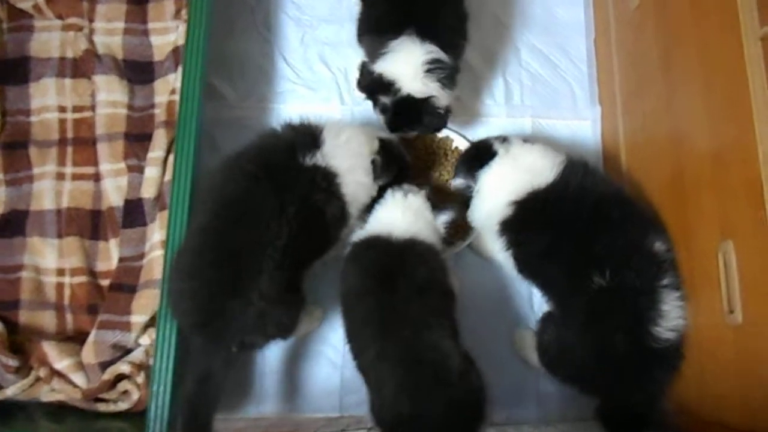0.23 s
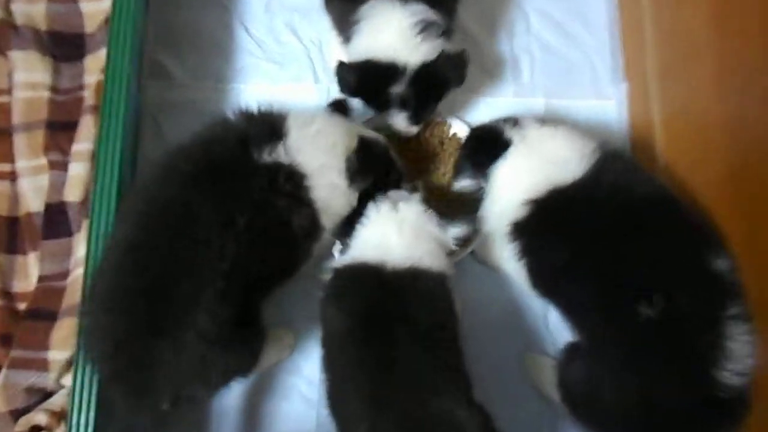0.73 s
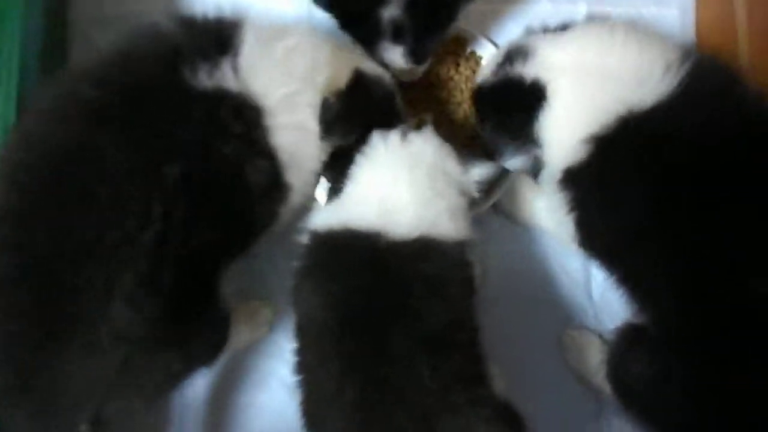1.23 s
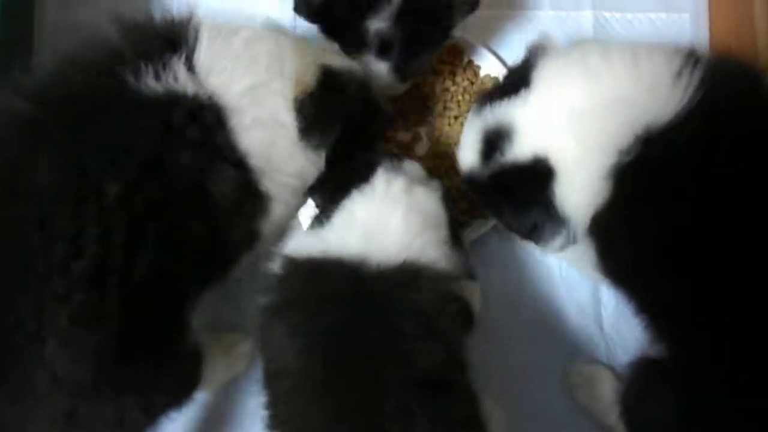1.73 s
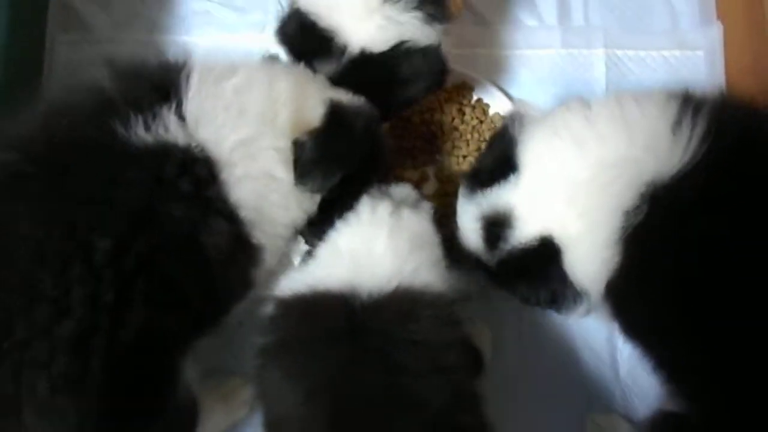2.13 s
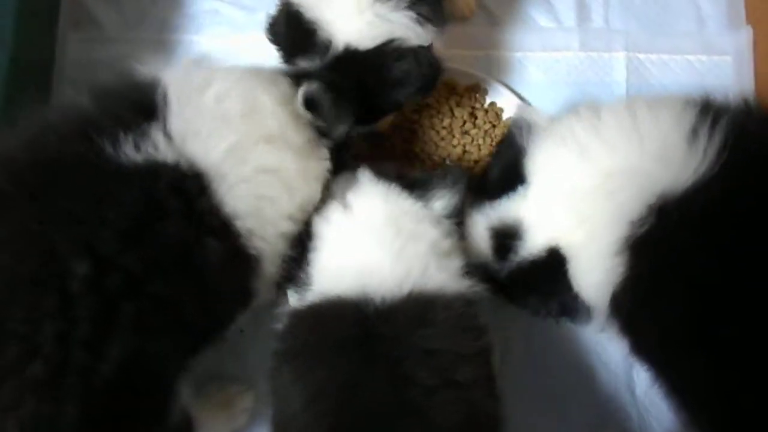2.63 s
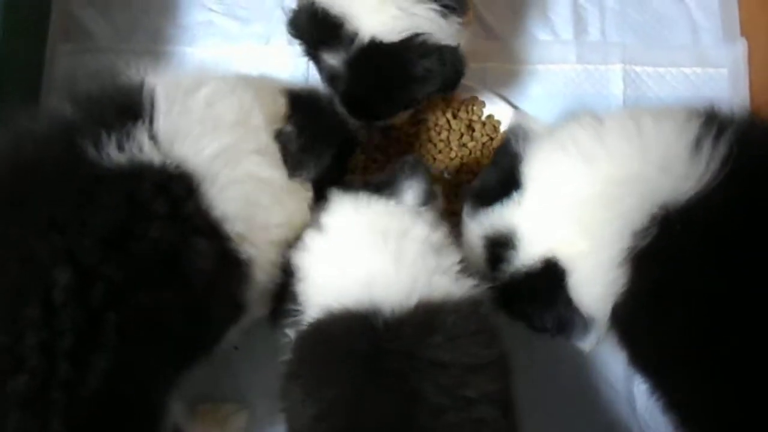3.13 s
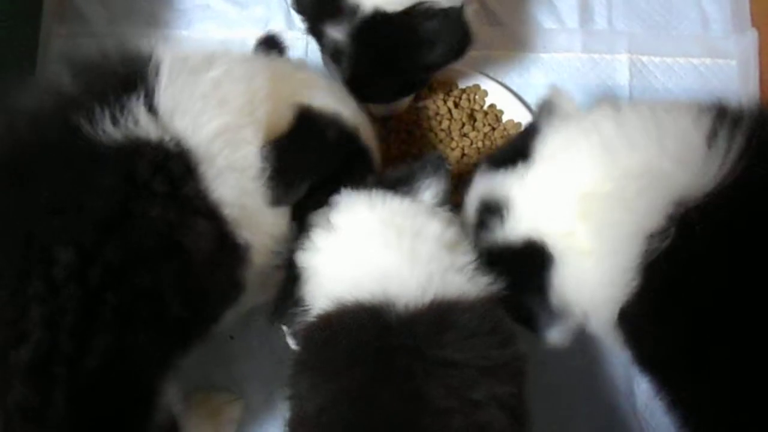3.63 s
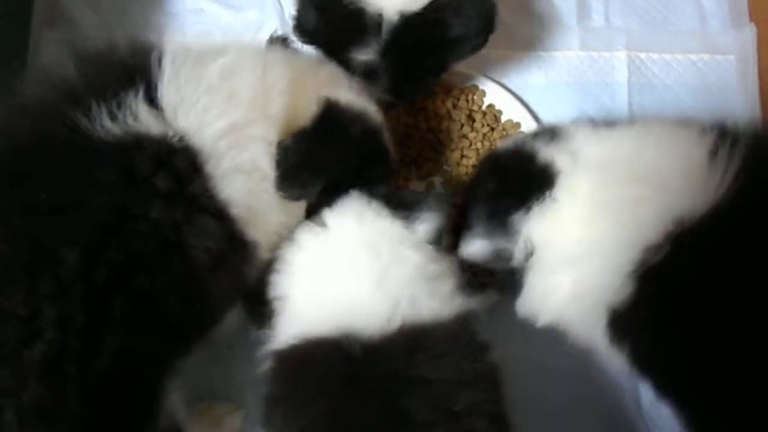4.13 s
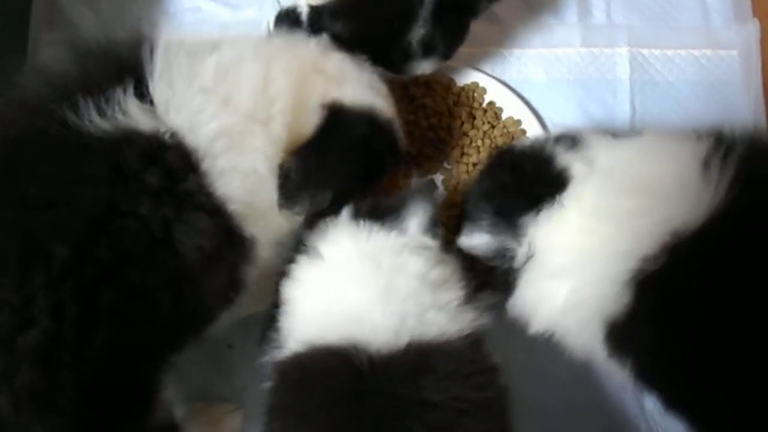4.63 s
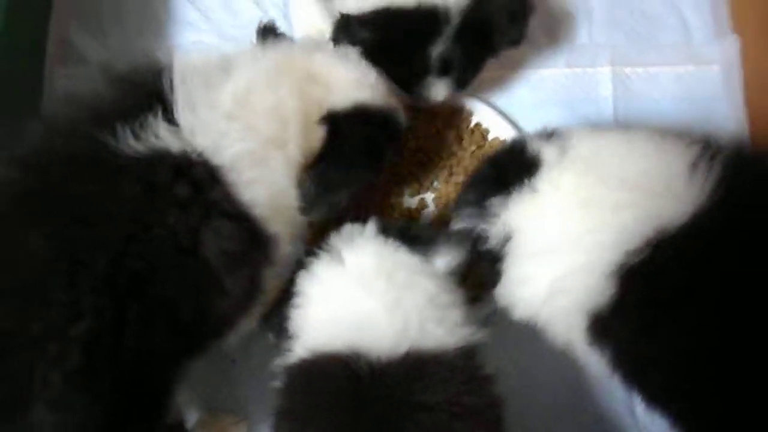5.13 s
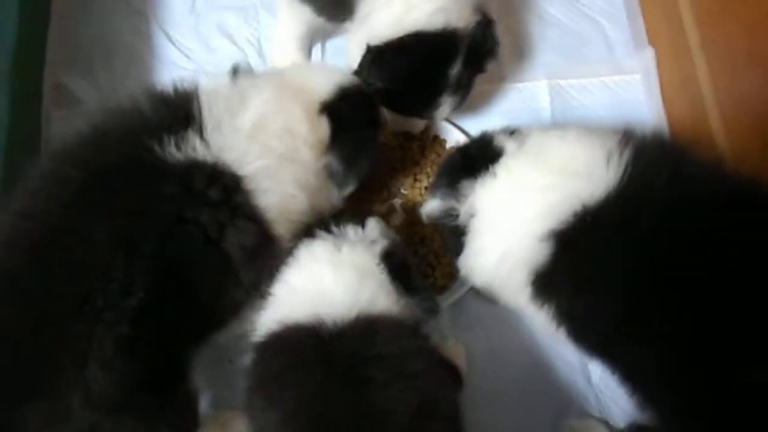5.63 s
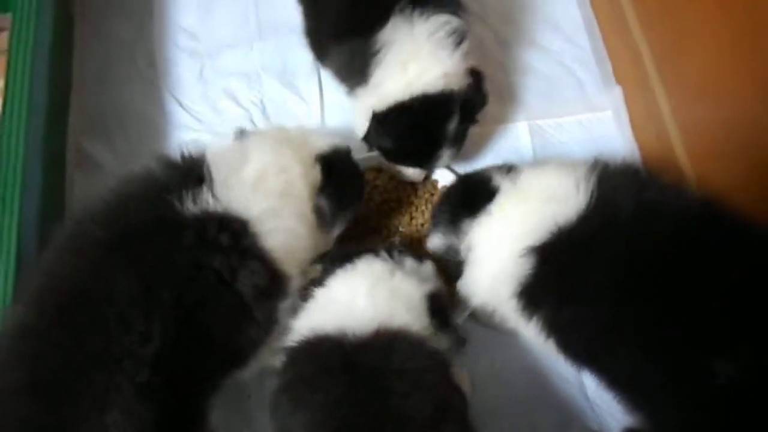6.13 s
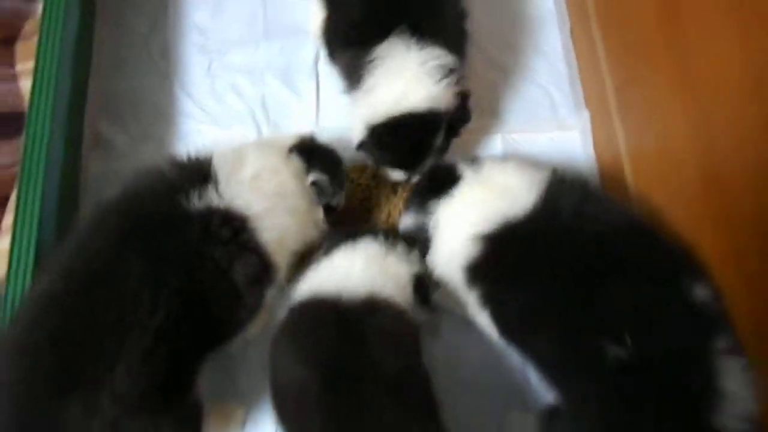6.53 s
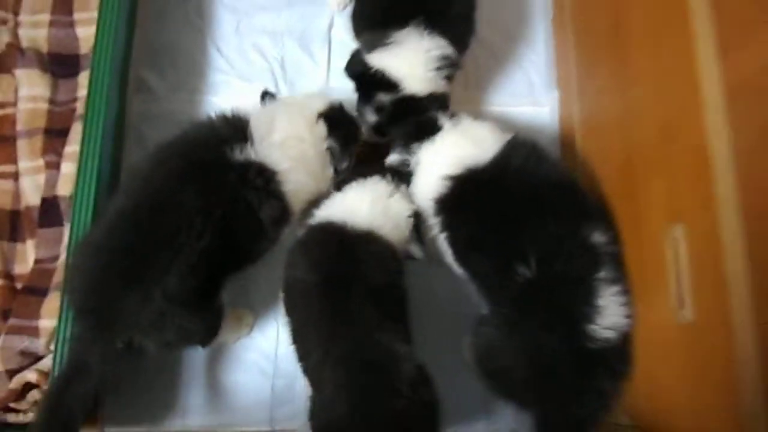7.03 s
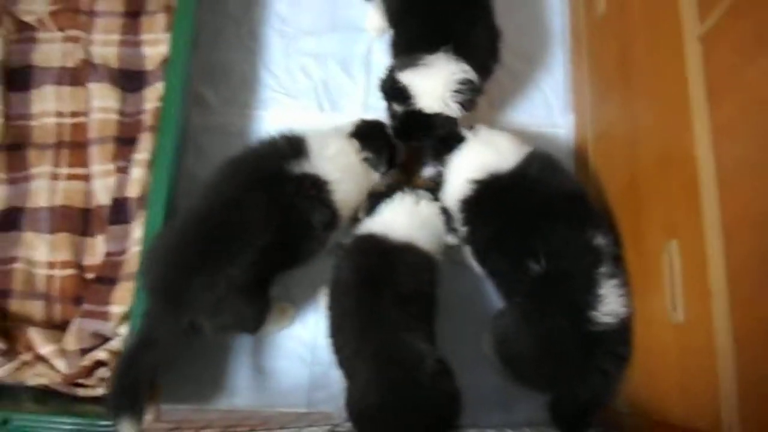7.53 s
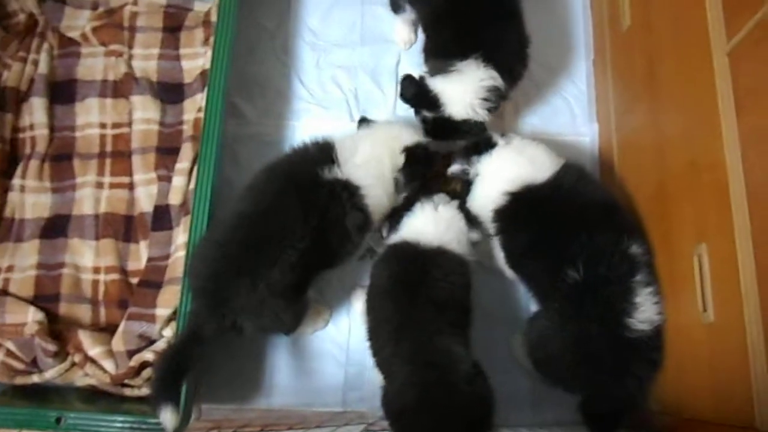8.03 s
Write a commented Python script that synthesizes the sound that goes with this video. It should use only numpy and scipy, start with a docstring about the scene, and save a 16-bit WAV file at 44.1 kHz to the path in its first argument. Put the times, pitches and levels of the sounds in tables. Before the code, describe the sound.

Puppies crunch dry kibble from a metal bowl, with sharp clicks, sniffs and a brief hoarse yelp near the start.

```python
"""Dry kibble cracks and crunches as four puppies crowd a metal bowl in a small room, heard close up.
Teeth snap pellets in ringing clicks and crush them to crumbs; muzzles stir the heap into a patchy rustle.
Air sniffs and whistles through noses, and paws bump the floor. One puppy whines, yelps twice and
whimpers in hoarse, wavering harmonics. Underneath lie room tone and the rumble of a hand-held microphone."""
import sys
import numpy as np
from scipy import signal
from scipy.fft import rfft, irfft, next_fast_len
from scipy.io import wavfile

SR = 44100
rng = np.random.default_rng(int(sys.argv[2]) if len(sys.argv) > 2 else 0)


def dump_mix(stems):
    """Bounce the given channels to the path in sys.argv[1] as a 16-bit WAV at rate SR."""
    frames = np.atleast_2d(stems).T  # one column per channel
    limited = np.clip(frames, -1, 1)  # hard clip at full scale
    pcm = np.round(limited * 32767).astype(np.int16)
    wavfile.write(sys.argv[1], SR, pcm)


N = 365765


def from_db(db):
    return 10 ** (np.asarray(db) / 20)


def rms_one(x):
    return x / np.sqrt(np.mean(x ** 2) + 1e-20)


def curves(rows, t):
    """One curve per column after the first, which holds the times."""
    times, *columns = np.transpose(rows)
    return [np.interp(t, times, column) for column in columns]


def drift(rate_hz, size):
    """Smooth random wander with a spread of 1."""
    pole = np.exp(-16 * np.pi * rate_hz / SR)
    slow = signal.lfilter([1], [1, -2 * pole, pole * pole], rng.standard_normal(size // 8 + 4002))
    return np.interp(np.arange(size) / 8, np.arange(size // 8 + 2), (slow / slow.std())[4000:])


def resonance(x, hz, width_hz):
    """Two-pole band-pass."""
    r = np.exp(-np.pi * width_hz / SR)
    feedback = [1, -2 * r * np.cos(2 * np.pi * hz / SR), r * r]
    return signal.lfilter([(1 - r * r) / 2, 0, (r * r - 1) / 2], feedback, x)


def band(x, hz, width_hz):
    """Two resonances in series for steep skirts; rms 1."""
    return rms_one(resonance(resonance(x, hz, width_hz), hz, 2 * width_hz))


def body(x, modes):
    """Parallel steep resonances with alternating signs."""
    return sum((-1) ** k * from_db(level_db) * resonance(resonance(x, hz, width), hz, 2 * width)
               for k, (hz, width, level_db) in enumerate(modes))


def equalise(x, spectrum):
    """An EQ curve drawn on a log-frequency axis; rms 1."""
    size = next_fast_len(len(x))
    hz, gain_db = np.transpose(spectrum)
    bins_hz = np.arange(size // 2 + 1) * SR / size
    gain = from_db(np.interp(np.log(bins_hz + 1), np.log(hz), gain_db))
    return rms_one(irfft(rfft(x, size) * gain, size)[:len(x)])


def grains(per_s, spread_db, size):
    """Random clicks, more uneven as spread_db grows; rms 1."""
    heights = from_db(spread_db * np.minimum(rng.exponential(1, size), 5)) * rng.choice([-1, 1], size)
    return rms_one(heights * (rng.random(size) < per_s / SR))


def place(out, sound, start_s, peak_db):
    at = round(start_s * SR)
    out[at:at + len(sound)] += (from_db(peak_db) * sound / np.abs(sound).max())[:N - at]


def span(rows):
    """A short sound's samples, times and 3 ms fades."""
    at = np.arange(round(rows[0][0] * SR), min(round(rows[-1][0] * SR), N))
    fade = np.minimum(1, np.minimum(at - at[0], at[-1] - at) / (.003 * SR))
    return at, at / SR, fade


def swell(peak_s, rise_s, fall_s, *levels_db, hz=None, edge_db=-14):
    """Start, peak and end rows of a swell: time, pitch if given, levels."""
    times = [max(peak_s - rise_s, 0), peak_s, peak_s + fall_s]
    pitch = [] if hz is None else [hz]
    arch_db = np.array([edge_db, 0, edge_db])
    return np.column_stack([times, *pitch, *(level_db + arch_db for level_db in levels_db)])


def glides(rows):
    """Swells of one gliding partial."""
    return [swell(peak_s, rise, fall, level_db, hz=hz) for peak_s, rise, fall, *hz, level_db in rows]


def tones(calls, harmonics, wobble, hoarse, throb_hz=0):
    """Partials on a wobbling pitch; hoarseness shakes each fast, and a close second tone adds a throb."""
    out = np.zeros(N)
    for rows in calls:
        at, t, fade = span(rows)
        hz, *levels_db = curves(rows, t)
        cycles = np.cumsum(hz * (1 + wobble * drift(51, len(at)))) / SR
        for k, level_db in zip(harmonics, levels_db):
            shake = 1 + hoarse * (drift(77, len(at)) + 1j * drift(110, len(at)))
            wave = np.exp(2j * np.pi * (k * cycles + rng.random())) * shake / np.sqrt(1 + 2 * hoarse ** 2)
            if throb_hz:
                wave *= 1 + .8 * np.exp(2j * np.pi * throb_hz * (t - t[0]))
            out[at] += fade * np.sqrt(2) * from_db(level_db) * wave.real
    return out


def airflow(puffs, modes, flutter_db):
    """Swells of turbulent air through a set of resonances."""
    air, out = rms_one(body(rng.standard_normal(N), modes)), np.zeros(N)
    for puff in puffs:
        rows = swell(*puff)
        at, t, fade = span(rows)
        out[at] += fade * from_db(curves(rows, t)[0] + flutter_db * drift(65, len(at))) * air[at]
    return out


def background():
    """Steady room tone, its low murmur, and rumble from the hand on the microphone."""
    room_spectrum = [(15, -30), (25, -4.5), (103, -35), (188, -9.5), (304, 2.5), (466, -4.5), (529, -6),
                     (647, 8.5), (753, -5), (1070, 1.5), (1450, -16), (3170, -16.5), (5670, -10.5),
                     (8700, -16.5), (10400, -28.5), (13500, -80), (22000, -120)]  # room tone colour: frequency_hz, gain_db
    murmur_levels = [(0.0, -60), (1.82, -64.5), (2.15, -63), (2.42, -64), (6.53, -64.5), (8.01, -59.5),
                     (8.29, -59.5)]  # room murmur: time_s, level_db
    hand_levels = [(0.0, -67), (0.11, -74), (3.53, -78.5), (3.62, -67), (4.62, -83.5), (5.12, -72),
                   (6.3, -80.5), (8.29, -77.5)]  # hand rumble: time_s, gain_db
    t = np.arange(N) / SR
    room_tone = from_db(-63) * equalise(rng.standard_normal(N), room_spectrum)
    murmur = band(rng.standard_normal(N), 499, 280)
    murmur *= from_db(curves(murmur_levels, t)[0] + 1.3 * drift(26, N))
    rumble = band(rng.standard_normal(N), 64.3, 66) + .8 * band(rng.standard_normal(N), 140, 130)
    rumble *= from_db(curves(hand_levels, t)[0] + .86 * drift(15, N))
    return room_tone + murmur + rumble


def room_reverb(x, t60_s=.079, wall_cut_hz=2600):
    """Eight echo paths between close walls, duller on every round."""
    size = next_fast_len(N + SR)
    hz = np.arange(size // 2 + 1) * SR / size
    wall, tail = 1 / (1 + 1j * hz / wall_cut_hz), 0
    for k, lag_s in enumerate(rng.uniform(.006, .03, 8)):
        loop = from_db(-60 * lag_s / t60_s) * wall * np.exp(-2j * np.pi * hz * lag_s)
        tail += (-1) ** k * loop / (1 - loop)
    return irfft(rfft(x, size) * tail, size)[:N]


def stirring(tick_db=-7.5):
    """Pellets rub in a patchy rustle; now and then one ticks at a pitch of its own."""
    heap_levels = [(0.0, -49, -54), (0.23, -56, -57.5), (0.53, -55, -60), (0.95, -55, -57.5),
                   (1.18, -55, -55.5), (1.68, -58.5, -61.5), (2.26, -57, -55.5), (2.47, -60.5, -61),
                   (3.53, -59, -61.5), (3.88, -58, -58), (4.59, -63.5, -63.5), (4.87, -61.5, -60.5),
                   (5.47, -57, -58.5), (5.98, -59.5, -61.5), (6.6, -60.5, -60.5), (8.29, -59, -64)]  # muzzles in the heap: time_s, bright_db, dull_db
    rub_spectrum = [(880, -52.5), (1500, -3), (2480, -4), (2660, -4), (3930, -5.5), (7510, -11),
                    (9890, -23), (10400, -22), (13500, -59), (22000, -120)]  # colour of the rubbing: frequency_hz, gain_db
    bright_db, dull_db = curves(heap_levels, np.arange(N) / SR)
    clumps_db = 1.2 * drift(12, N)
    rubbing = equalise(grains(7000, 2.63, N), rub_spectrum)
    bright = sum(resonance(rubbing, hz, .6 * hz) * from_db(2.5 * drift(20, N))
                 for hz in (2400, 3800, 6000, 9000))
    bright = rms_one(bright) * from_db(bright_db + clumps_db)
    dull = band(grains(4000, 1.77, N), 810, 1030) * from_db(dull_db + clumps_db + 2 * drift(29, N))
    knocks, pitch_index = grains(200, 4.2, N), rng.integers(0, 14, N)
    ticks = sum(band(knocks * (pitch_index == k) + 1e-18, hz, 300 + .05 * hz)
                for k, hz in enumerate(np.geomspace(900, 6000, num=14)))
    return bright + dull + rms_one(ticks) * from_db(bright_db + tick_db)


def thumps():
    """Paws and bowl bump the floor: a puff of noise through a low, wide resonance."""
    bumps = [(0.72, -54.5, 191), (1.359, -51, 350), (2.149, -57, 226), (3.619, -63, 67.3),
             (3.799, -48, 300), (4.969, -57, 161), (5.199, -56, 102), (5.72, -57, 245), (7.428, -47, 236),
             (7.469, -49, 350), (7.648, -54, 186), (8.097, -51, 218)]  # floor bumps: start_s, peak_db, pitch_hz
    out, t = np.zeros(N), np.arange(SR // 5) / SR
    for start_s, peak_db, hz in bumps:
        puff = rng.standard_normal(len(t)) * t * np.exp(-t / .0098)
        place(out, band(puff, hz, .69 * hz), start_s, peak_db)
    return out


def noses():
    """Air through the nose makes breathy whistles and broad sniffs."""
    # nose whistles: peak_s, rise_s, fall_s, first_hz, peak_hz, last_hz, level_db
    whistles = [(1.08, .03, .04, 7900, 7950, 7750, -58), (1.355, .02, .04, 7700, 7600, 7600, -57),
                (5.12, .045, .085, 9250, 8750, 9450, -46), (5.44, .075, .045, 8550, 9000, 9450, -50),
                (5.435, .02, .055, 6650, 6650, 6600, -50), (5.76, .05, .03, 8300, 8950, 9050, -66),
                (2.475, .02, .03, 2850, 2700, 2250, -54)]
    sniffs = [(1.23, 0.14, .1, -51), (5.46, .015, 0.11, -48.5), (5.567, .07, 0.021, -40),
              (6.301, .004, 0.024, -53), (6.335, 0.033, 0.16, -51.5), (6.523, 0.0034, 0.0053, -50),
              (6.536, 0.0039, 0.023, -47), (6.6, .014, 0.12, -46.5), (6.726, 0.0031, 0.015, -48.5)]  # puffs of air: peak_s, rise_s, fall_s, level_db
    nose_modes = [(1092, 250, 6), (2800, 3400, -7), (5660, 720, 6.5), (7550, 1900, -10)]  # nasal resonances: centre_hz, width_hz, gain_db
    whistling = tones(glides(whistles), [1], wobble=.007, hoarse=1)
    return whistling + airflow(sniffs, nose_modes, flutter_db=2.5)


def whimpers():
    """Short soft swells on a gliding pitch, with weak harmonics up to the eighth."""
    # soft cries: start_s, length_s, first_hz, last_hz, fundamental_db, octave_db, upper_db
    soft_cries = [(1.579, 0.049, 565, 622, -43.5, -42.5, -54.5), (1.916, 0.067, 523, 599, -44, -55, -76),
                  (2.088, 0.057, 567, 579, -42.5, -57, -67), (3.202, 0.052, 740, 758, -49, -62, -62)]
    swell_db = np.array([-2, 0, 3, -4.5, -34])
    comb_db = np.array([-6, -3, -12, 1.5, -2, -14])  # harmonics 3 to 8
    calls = []
    for start_s, length_s, first_hz, last_hz, fundamental_db, octave_db, upper_db in soft_cries:
        times = start_s + length_s * np.array([0, .2, .4, .75, 1])
        levels_db = [db + swell_db for db in [fundamental_db, octave_db, *(upper_db + comb_db)]]
        calls.append(np.column_stack([times, np.linspace(first_hz, last_hz, num=5), *levels_db]))
    return tones(calls, range(1, 9), wobble=.005, hoarse=.4)


def cries(rows, overtone, weak=(), weak_db=-25):
    """Hoarse swells of a fundamental, one overtone at its own level, and any weak harmonics."""
    out = np.zeros(N)
    for peak_s, rise, fall, *hz, low_db, high_db, hoarse in rows:
        call = swell(peak_s, rise, fall, low_db, high_db, *[low_db + weak_db] * len(weak), hz=hz)
        out += tones([call], [1, overtone, *weak], wobble=.0069, hoarse=hoarse)
    return out


def yelp(pitch_hz=565.5, mouth_db_per_octave=39):
    """The opening mouth hands a steady pitch from harmonic 2 to 3; a partial near the sixth flares once."""
    contour = [(1.255, -56, 1400), (1.27, -21, 1190), (1.283, -13.5, 1176), (1.289, -17, 1260),
               (1.297, -20.5, 1690), (1.312, -14.5, 1540), (1.319, -38, 1610), (1.338, -32.5, 1650),
               (1.36, -44, 1440), (1.39, -46, 1500)]  # the loud yelp: time_s, level_db, mouth_resonance_hz
    times, level_db, mouth_hz = np.transpose(contour)
    harmonics_db = [level_db - mouth_db_per_octave * np.abs(np.log2(k * pitch_hz / mouth_hz))
                    for k in (2, 3)]
    flare_db = -33 - 448 * np.abs(times - 1.285)
    call = np.column_stack([times, np.full_like(times, pitch_hz), *harmonics_db, flare_db])
    return tones([call], [2, 3, 6.08], wobble=.006, hoarse=.25)


def voice():
    """One throat whines, yips, warbles, yelps and whimpers; breath roughens the yip and yelp."""
    # whines and yips: peak_s, rise_s, fall_s, first_hz, peak_hz, last_hz, level_db, overtone_db, hoarseness
    whines = [(.015, .02, .016, 946, 943, 910, -35.5, -39, 0.3),
              (.11, .1, .06, 851, 885, 955, -45.5, -65, 0.6),
              (.195, .022, 0.018, 948, 933, 920, -30, -61, 0.25)]
    yips = [(1.012, .024, 0.034, 705, 741, 767, -38.5, -34, 0.81),
            (1.328, .028, 0.033, 1990, 1986, 1954, -41, -43, 0.16)]
    # throbbing cry: peak_s, rise_s, fall_s, first_hz, peak_hz, last_hz, level_db
    warbles = [(1.082, 0.028, 0.041, 1320, 1225, 1283, -30.5)]
    rasps = [(1.001, 0.013, 0.064, -43), (1.271, 0.029, 0.063, -27)]  # breath in the cries: peak_s, rise_s, fall_s, level_db
    throat_modes = [(760, 100, -9.5), (1120, 114, 0.5), (1650, 250, 1.5), (3410, 320, -2), (4370, 960, -19)]  # throat resonances: centre_hz, width_hz, gain_db
    voiced = cries(whines, overtone=4, weak=(2, 3)) + cries(yips, overtone=2) + yelp()
    warble = tones(glides(warbles), [1], wobble=.008, hoarse=.35, throb_hz=100)
    return voiced + warble + whimpers() + airflow(rasps, throat_modes, flutter_db=1)


def crunches(crumble_s=.018, crumble_per_rise=.6):
    """Crumbs break densely while the jaw closes, then die off; a slower bite crumbles for longer."""
    # pellets crushed between teeth: start_s, level_db, colour_hz, rise_s, relative_rustle_db
    bites = [(0.163, -34.5, 2000, 0.0046, 7), (0.298, -27.5, 4450, 0.015, -13), (0.537, -37, 1200, .017, 4),
             (0.6788, -24, 4180, 0.005, 8.5), (0.713, -26.5, 5160, 0.0036, 8),
             (0.867, -27, 1180, 0.0009, -25), (1.916, -36, 3500, 0.016, 25),
             (2.095, -40.5, 1410, 0.0076, 0), (2.139, -34.5, 7000, 0.016, -1),
             (2.176, -36.5, 2800, 0.014, -5), (2.261, -38, 1510, 0.0099, 0),
             (2.306, -36.5, 1890, 0.0065, 3), (2.456, -42.5, 2570, 0.0086, -10),
             (3.028, -40.5, 1080, 0.0064, 6), (3.128, -34.5, 2170, 0.003, 0),
             (3.441, -36, 1220, 0.0061, 13), (3.597, -40, 1210, 0.014, 5),
             (3.785, -27.5, 6600, 0.022, -1.5), (3.954, -33.5, 1100, 0.0038, 5),
             (4.086, -41, 1370, 0.0044, -24), (4.329, -36, 1800, .0051, 1),
             (4.957, -34.5, 1860, 0.0069, 2.5), (5.643, -40, 1070, 0.0056, -20),
             (6.184, -36, 1410, 0.012, 3), (6.833, -39, 5360, 0.0078, 2), (7.326, -38, 1460, 0.0037, -4),
             (7.469, -33, 850, 0.0042, -15), (7.896, -35.5, 1830, 0.0029, -2),
             (8.088, -43.5, 1060, 0.0044, -4)]
    out, t = np.zeros(N), np.arange(SR // 5) / SR
    for start_s, level_db, hz, rise_s, rustle_db in bites:
        decay_s = min(crumble_s, 5 * rise_s) + crumble_per_rise * rise_s
        envelope = np.minimum(t / rise_s, 1) * np.exp(-(np.maximum(t - rise_s, 0) / decay_s) ** 1.7)
        crumbs = grains(12000, .24, len(t)) * envelope
        rustle = rms_one(resonance(crumbs, 2960, 3900) + resonance(crumbs, 1070, 720))
        place(out, band(crumbs, hz, .46 * hz + 100) + from_db(rustle_db) * rustle, start_s, level_db)
    return out


def snaps():
    """A hard click and two weaker rebounds ring the pellet briefly, and the bowl a little longer."""
    # pellets snapping or ticking on the bowl: start_s, level_db, ring_hz, relative_click_db
    cracks = [(0.441, -33.5, 1910, -22), (0.4733, -29.5, 7100, -14), (0.5203, -35.5, 5340, -8),
              (0.5606, -25.5, 3300, 7), (0.868, -16.5, 2160, -1), (1.1298, -30, 1250, -6),
              (1.1505, -15.5, 1020, 4.5), (1.296, -17, 5340, 4), (1.356, -33, 5340, -14),
              (1.372, -30, 686, 0.5), (1.5186, -28.5, 3920, -2), (1.7437, -39, 2270, -7),
              (1.8235, -35, 1470, 2), (2.405, -41, 2280, -9), (2.4112, -26.5, 3180, -24),
              (2.653, -43, 3190, -5), (2.709, -32, 3260, 5), (2.7775, -33, 2630, 0),
              (3.12, -32.5, 2280, -5), (3.1372, -30.5, 2400, 11), (3.2538, -28.5, 5850, 2),
              (3.52, -34, 2880, 23), (3.9727, -36, 780, -3), (4.186, -33, 4520, -3),
              (4.261, -32.5, 1370, -7.5), (4.385, -36, 935, -18), (4.41, -41, 1280, -12),
              (4.622, -32.5, 3490, 22), (4.656, -37, 2670, 9), (4.7149, -34.5, 7000, 8),
              (4.707, -43, 2600, -6), (4.776, -39.5, 1100, -8), (4.7856, -28.5, 567, 5),
              (4.823, -40, 4910, -5), (4.8689, -29.5, 730, 3), (5.0205, -40, 3270, -2),
              (5.1145, -43, 3080, -12), (5.2412, -27.5, 3280, 4), (5.2968, -32.5, 6600, -15),
              (5.3666, -33, 2720, -19), (5.7346, -40, 1110, -10), (5.9509, -41.5, 2710, -16),
              (6.0894, -32, 1850, 7), (6.1267, -26, 1680, -1.5), (6.245, -40, 4800, -8),
              (6.2722, -39, 3180, -6), (6.327, -34.5, 4100, -17), (6.489, -42, 4950, -9),
              (6.8685, -31, 1680, 0), (6.9494, -37.5, 2800, -7), (6.985, -46, 1700, -15),
              (7.036, -41, 3580, -6), (7.121, -40, 2580, -7), (7.2709, -42.5, 1220, -20),
              (7.3328, -29.5, 1490, -1), (7.395, -41.5, 1700, -12), (7.4568, -27, 4840, 6),
              (7.474, -30.5, 2050, -29), (7.5126, -39, 1810, -2), (7.898, -24.5, 1820, -1),
              (7.904, -27.5, 2800, -4), (8.051, -29, 4630, 9), (8.249, -29, 6140, -1.5)]
    bowl_modes = [(1183, 110, -1), (1680, 25, -7)]  # ring of the full bowl: centre_hz, width_hz, gain_db
    out = np.zeros(N)
    rebounds_s = rng.uniform(.001, .0028, len(cracks))
    for (start_s, level_db, hz, click_db), rebound_s in zip(cracks, rebounds_s):
        hits = np.full(SR // 20, 1e-18)
        hits[[0, round(rebound_s * SR), round(2.3 * rebound_s * SR)]] = 1, -.5, .25
        click = from_db(click_db) * rms_one(resonance(hits, 2700, 3200))
        place(out, band(hits, hz, 250 + .15 * hz) + click, start_s, level_db)
    return out + 1.2 * body(out + 1e-18, bowl_modes)


def scene(treble_cut_hz=6330, wet_db=-12):
    """Mono mix of puppies and room; a gentle low-pass softens the top of the snaps and crunches."""
    soften = signal.butter(2, treble_cut_hz, fs=SR, output="sos")
    pellets = signal.sosfilt(soften, snaps() + crunches())
    puppies = voice() + noses() + pellets + thumps()
    return (puppies + from_db(wet_db) * room_reverb(puppies) + stirring() + background())[None]


def record(dry):
    """A steep low-pass takes off the top."""
    stop_hz = 10800
    return signal.sosfilt(signal.cheby2(12, 38, stop_hz, fs=SR, output="sos"), dry)


dry = scene()
out = record(dry)
dump_mix(out)
```